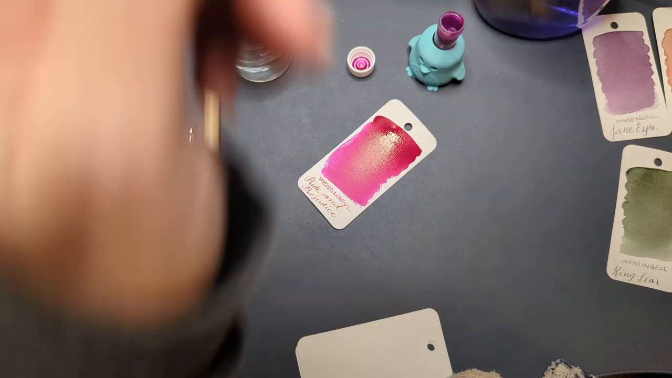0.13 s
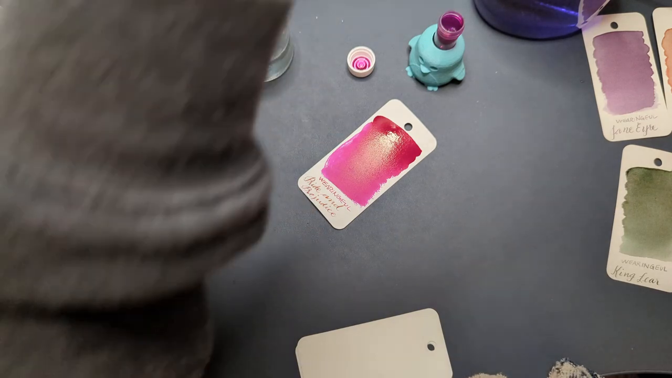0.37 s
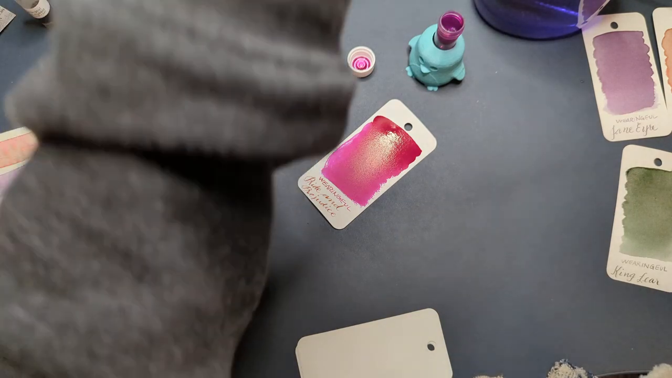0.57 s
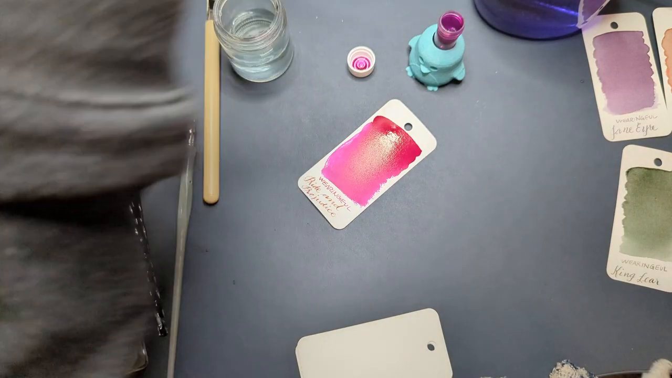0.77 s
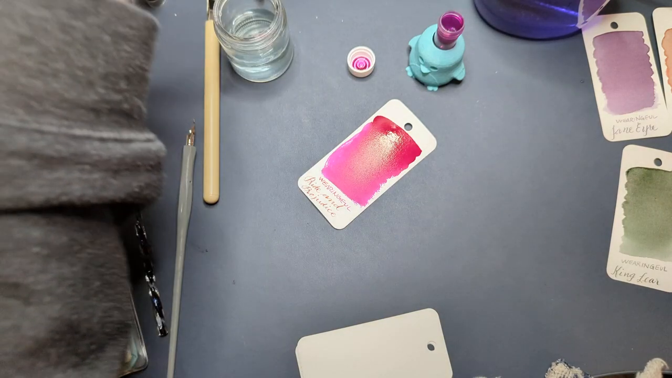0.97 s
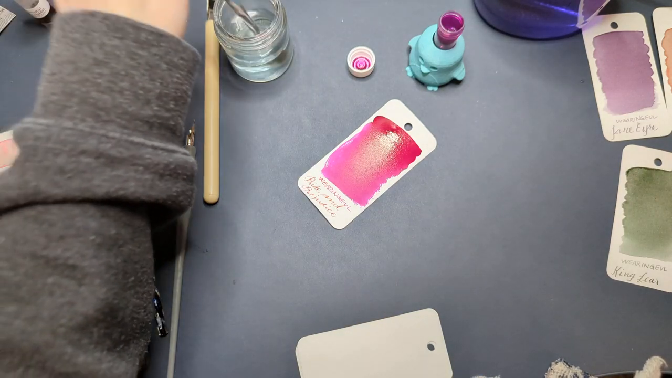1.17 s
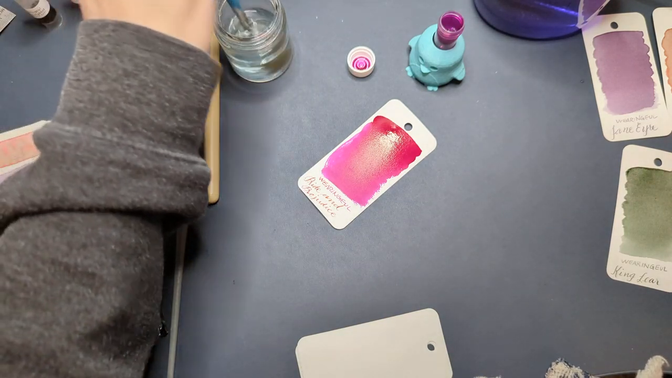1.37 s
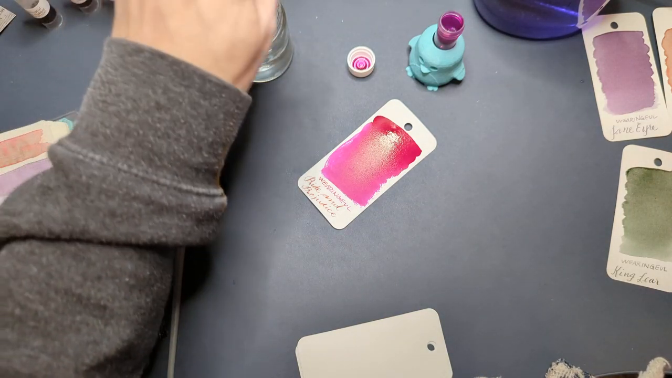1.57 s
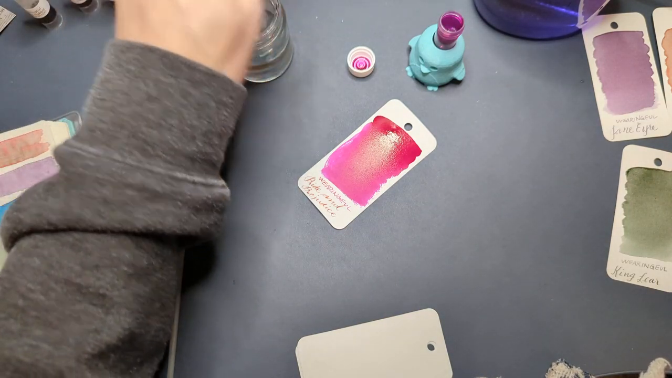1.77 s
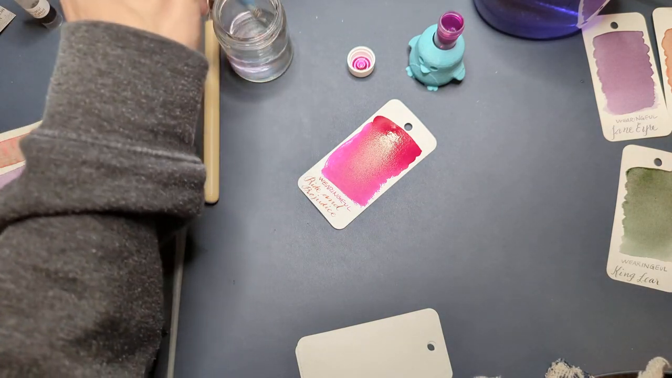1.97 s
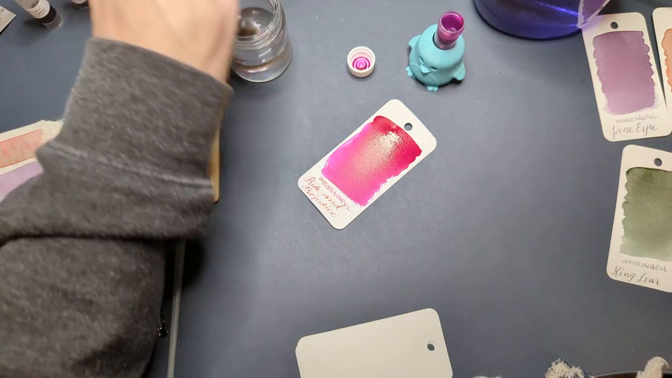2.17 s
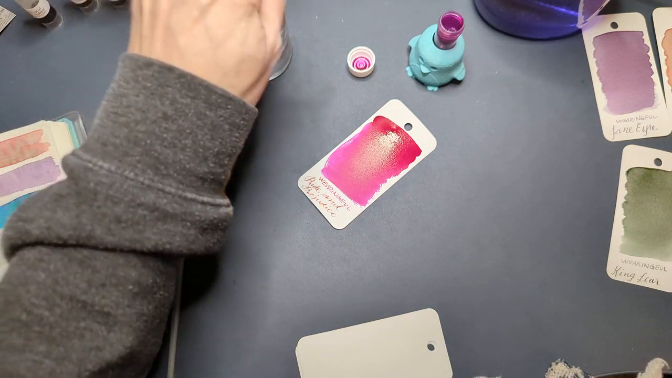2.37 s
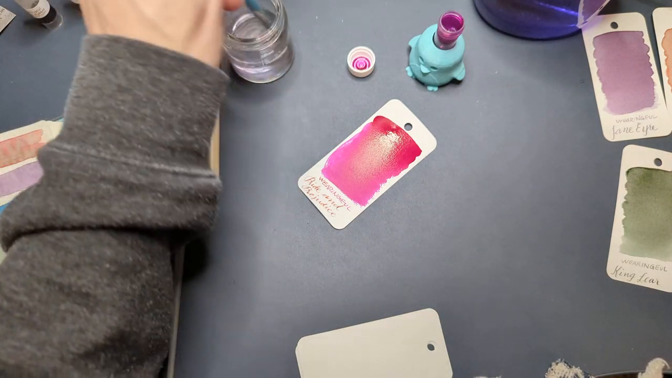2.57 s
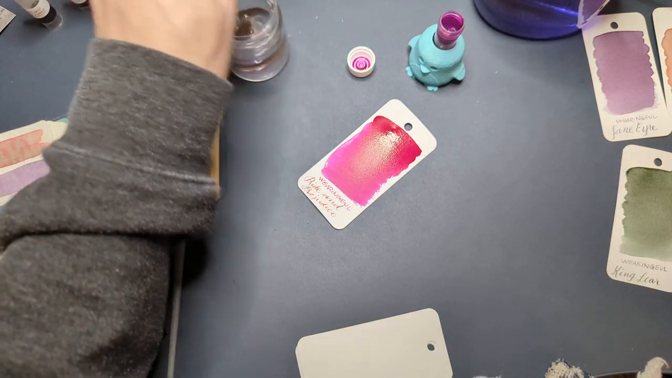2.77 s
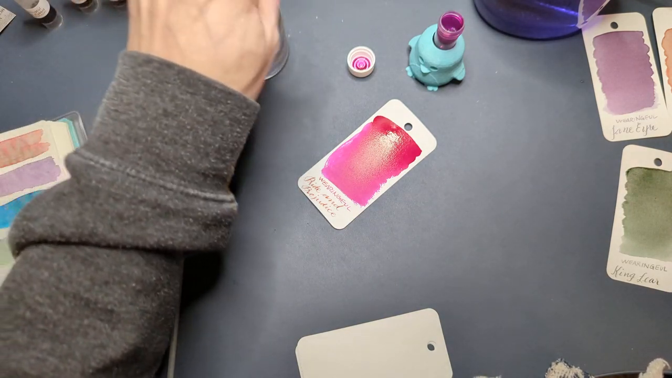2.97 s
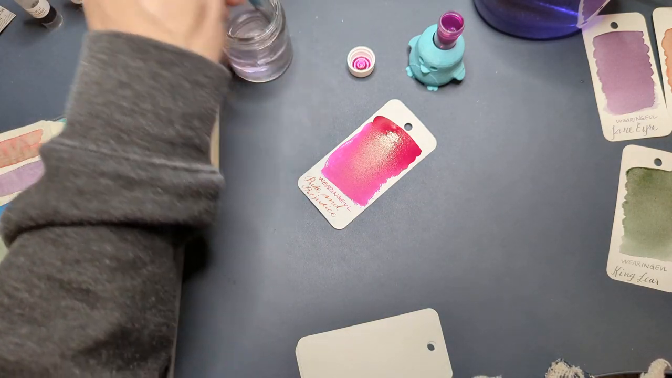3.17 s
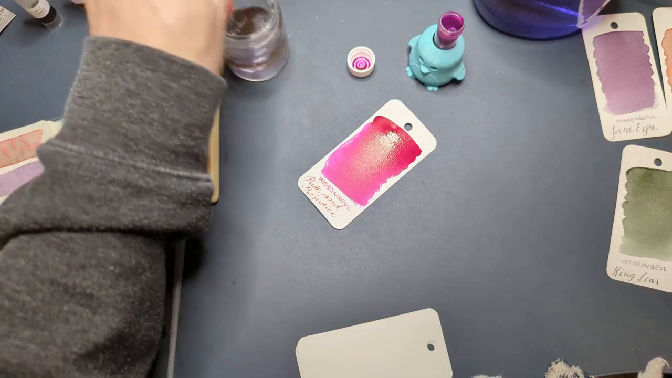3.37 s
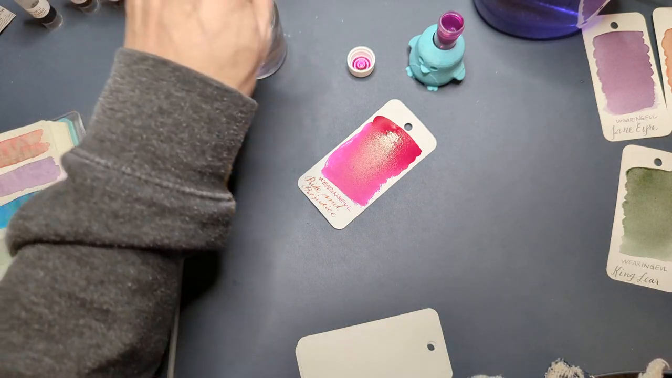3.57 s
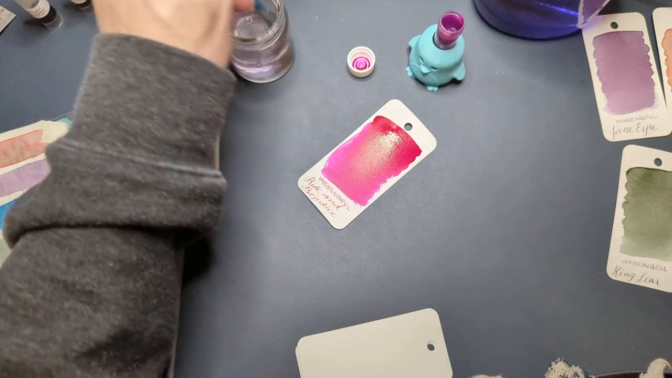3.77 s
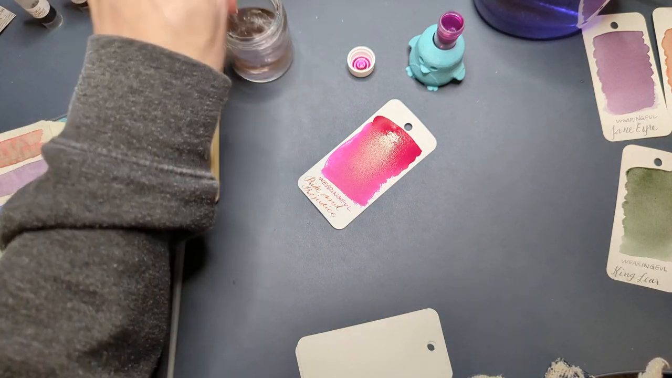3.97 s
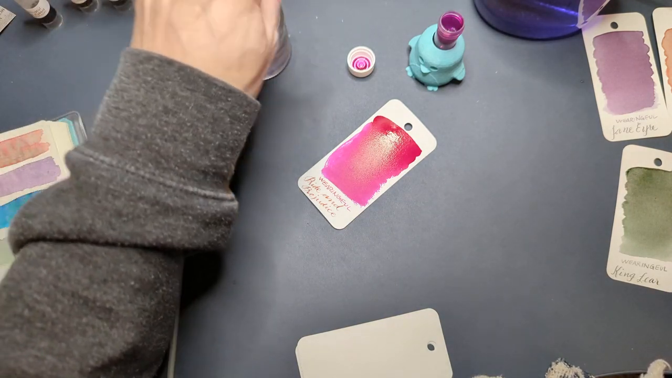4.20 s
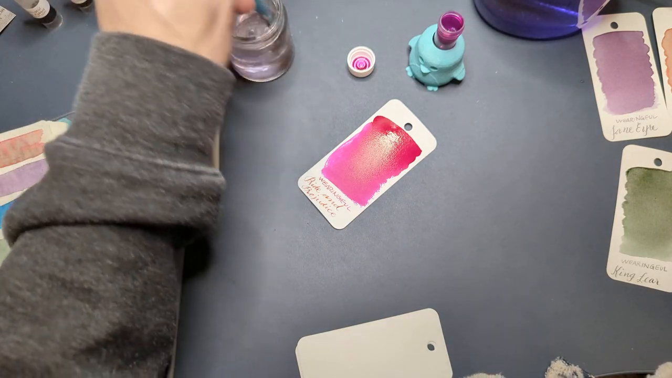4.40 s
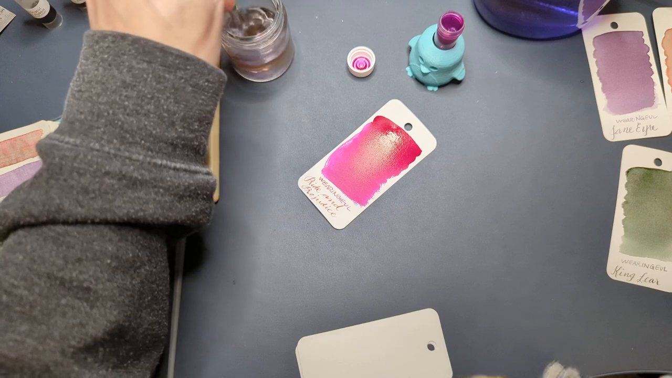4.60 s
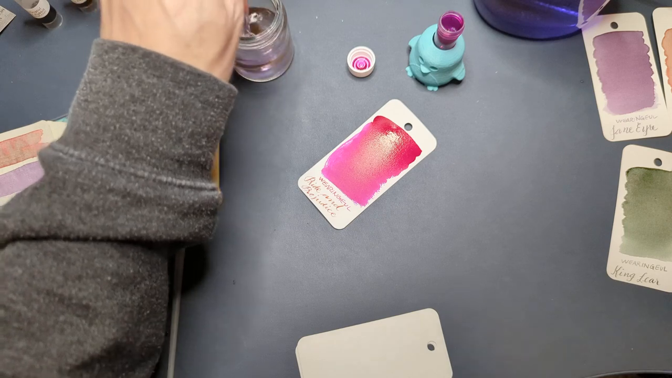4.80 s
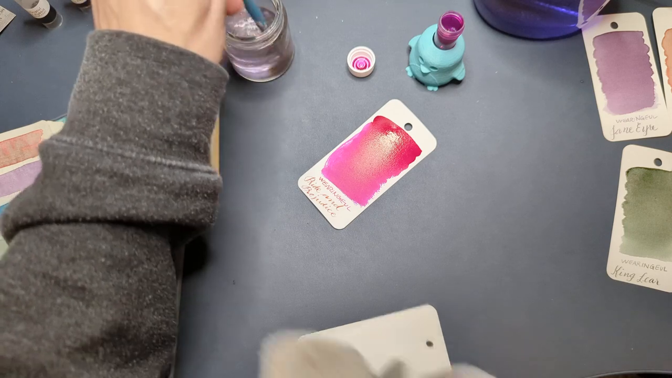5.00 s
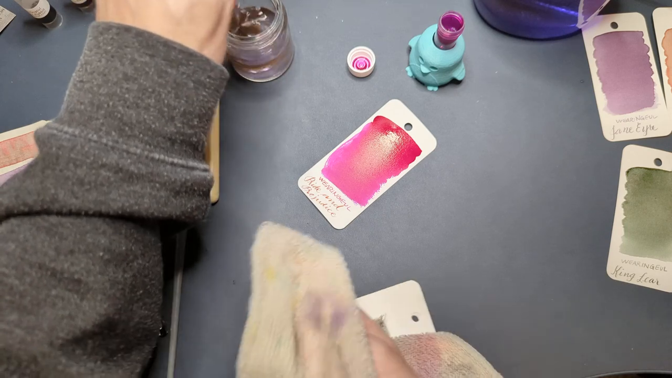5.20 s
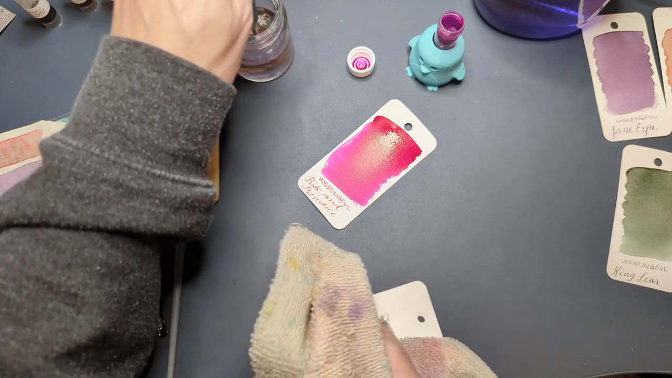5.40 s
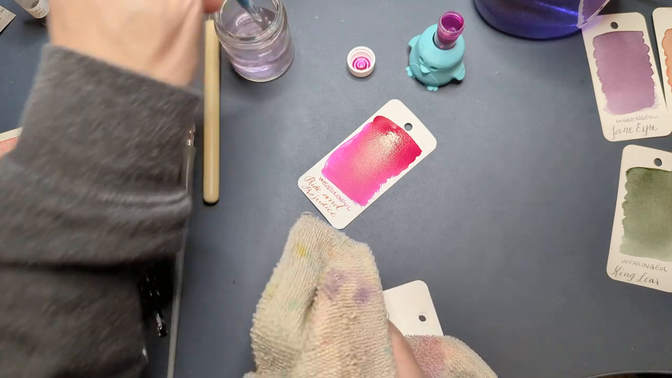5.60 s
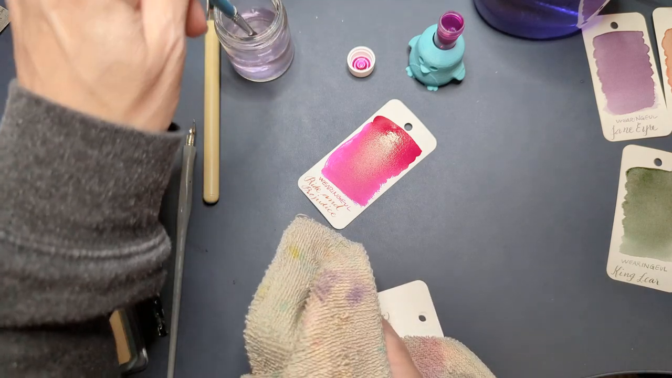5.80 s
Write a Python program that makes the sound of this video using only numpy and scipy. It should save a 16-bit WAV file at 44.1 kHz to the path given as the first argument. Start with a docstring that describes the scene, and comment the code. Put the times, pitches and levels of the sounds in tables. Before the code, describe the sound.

A pen taps inside a small glass jar of water, sparsely then steadily, with soft desk rumbles and a late sleeve rustle.

```python
"""In a quiet room, a phone above the desk hears house hum and hiss throughout: shaped stereo noise.
A pen in a small glass jar of water gives sparse clinks, then from 2 s about three a second with rebounds.
Each clink is a noise crack and decaying sines for the parts of the jar, answered by the walls.
Each full tap nudges the jar, which rumbles on the desk mat: noise in three bands.
A sleeve rustles faintly at the start and plainly from about 4.6 s: cloth-coloured noise."""
import sys
import numpy as np
from scipy import signal
from scipy.fft import rfft, irfft, next_fast_len
from scipy.io import wavfile
from scipy.ndimage import map_coordinates

SR = 44100
rng = np.random.default_rng(int(sys.argv[2]) if len(sys.argv) > 2 else 0)


def generate_wav(sig):
    """Save sig (samples, or channels by samples) to the path in sys.argv[1] as 16-bit PCM at SR."""
    pcm = np.round(np.clip(np.atleast_2d(sig).T, -1, 1) * 32767).astype(np.int16)
    wavfile.write(sys.argv[1], SR, pcm)


N = 257984  # samples, about 5.85 s


def amp(db):
    """Amplitude factor of a level in dB."""
    return 10 ** (np.asarray(db) / 20)


def unit(x):
    """x scaled to rms 1."""
    return x / np.sqrt(np.mean(x ** 2) + 1e-20)


def along(points, hz):
    """Value at hz between (f/Hz, value) points, on a log frequency axis."""
    f, value = np.transpose(points)
    return np.interp(np.log(hz + 1), np.log(f + 1), value)


def filtered(x, response):
    """x times a (possibly complex) response of frequency."""
    m = next_fast_len(N + 8192)
    hz = np.fft.rfftfreq(m, 1 / SR)
    return irfft(rfft(x, m) * response(hz), m)[..., :N]


def wobble(rate):
    """A smooth random curve, rate knots a second."""
    knots = rng.standard_normal(int(N * rate / SR) + 4)
    return map_coordinates(knots, [np.arange(N) * rate / SR])


STEADY_TOP_HZ = 15900  # upper edge of the noise beds


def rush(spectrum, alike):
    """Stereo noise of rms 1: the share of mid and side sets how alike the two ports are at each frequency."""
    def mid_and_side(hz):
        turn = np.arccos(np.clip(along(alike, hz), -1, 1)) / 2
        shape = amp(along(spectrum, hz)) * (hz < STEADY_TOP_HZ)
        return shape * [np.cos(turn), np.sin(turn)]

    mid, side = filtered(rng.standard_normal((2, N)), mid_and_side)
    return unit(np.array([mid + side, mid - side]))


# full taps of the pen: (t/s, crack level/dB, ring levels/dB of base, wall, belly, shoulder, neck,
# push on the jar level/dB)
FULL_TAPS = [(0.0167, -58, -52.5, -46.5, -46.5, -56, -62, -77),
             (1.269, -27.5, -39.5, -32, -44.5, -70, -38, -54),
             (2.0746, -72.5, -57, -26.5, -64, -84, -71, -86), (2.1532, -27, -61, -10.5, -43, -57, -31, -52),
             (2.4907, -19, -44.5, -25.5, -32, -32, -32, -48),
             (2.7625, -23, -54, -34, -37, -34.5, -24.5, -45),
             (3.1139, -14, -50.5, -29.5, -32, -25.5, -21.5, -47.5),
             (3.3878, -10, -58, -35, -30, -24, -15, -44), (3.707, -16, -46, -35, -31, -22.5, -21, -43),
             (4.0042, -18, -42.5, -30.5, -32, -26.5, -26, -46.5),
             (4.348, -16.5, -47, -29.5, -33.5, -27, -14.5, -49),
             (4.6492, -35, -60, -32, -52, -41.5, -36.5, -59),
             (4.9583, -13, -63.5, -40, -33.5, -39, -47, -62),
             (5.2325, -35, -63.5, -36, -49, -47, -40.5, -62.5),
             (5.5135, -18.5, -69, -52, -39, -36.5, -63, -68.5)]
# glancing rebounds, too light to move the jar: (t/s, crack level/dB, neck ring level/dB)
REBOUNDS = [(2.803, -20.5, -44.5), (3.1556, -24.5, -35), (3.4183, -21, -46.5), (4.0366, -19, -52.5),
            (4.2033, -49.5, -75), (4.4037, -27, -39), (5.026, -39.5, -52), (5.2588, -30.5, -54.5)]
# a rebound's ring against its crack: (base, wall, belly, shoulder level/dB)
GLANCE_DB = (-27.5, -28, -20, -25.5)
RIM_DB = -21  # the thin rim follows the sharpness of the blow: its ring against the crack


def contacts():
    """Rows of t/s, crack level/dB and ring levels/dB of base, wall, belly, shoulder, neck and rim."""
    full = [row[:-1] for row in FULL_TAPS]
    light = [(s, crack, *np.add(crack, GLANCE_DB), neck) for s, crack, neck in REBOUNDS]
    return [(*row, row[1] + RIM_DB) for row in full + light]


def ring(modes, part, length, t):
    """Decaying modes of one struck part, strengths new each blow; each port has its own level and phase."""
    swell, scatter, pan_db, lead = part
    ports = np.array([[.5], [-.5]])  # left, right
    tones = 0
    for hz, db, t60 in modes:
        level = amp(db + 2 * rng.normal() - 60 * t / (length * t60))
        pitch = hz * (1 + scatter * rng.normal())
        tones = tones + level * np.sin(2 * np.pi * pitch * t + ports * lead)
    return amp(ports * pan_db) * (1 - np.exp(-t / swell)) ** 3 * tones


# modes of the jar, one list each for base, wall, belly, shoulder, neck, rim:
# (f/Hz, mean level/dB, t60/s before the water damps it)
JAR_MODES = [
    [(880, -4, .05), (1003, 0, .05), (1114, -1.5, .05), (1250, -1.5, .05), (1400, 0, .05),
     (1500, -2.5, .05)],
    [(1590, -9, .03), (1642, -2.5, .04), (1697, 0, .05), (1770, -12, .03)],
    [(1860, 0, .03), (2090, 0, .03), (2300, -4, .025), (2500, -5, .025), (2780, -3, .025), (3080, -5, .025),
     (3370, -4, .03)],
    [(4550, -8, .035), (4910, -6, .03), (5220, 0, .03), (5420, -6, .025), (5650, -5, .025)],
    [(6145, -5, .07), (6283, 0, .045), (6500, -18, .04)],
    [(8090, 0, .02), (9880, 0, .02), (11000, -2, .018), (12300, 1, .02), (14300, -3, .015)],
]
# the same parts: (build-up t/s, relative pitch scatter from the sloshing water, left over right level/dB,
# left lead/rad)
JAR_PARTS = [(0.0012, 0.01, -2.05, 0.99), (0.0025, 0, 6.5, 0.33), (0.00033, 0.06, -0.6, 1.8),
             (.0006, 0.04, -1.54, 1.7), (0.00096, 0.01, -4.5, 0.89), (0.00013, 0.1, 5, 0.7)]
# colour of the pen's crack on the glass: (f/Hz, filter level/dB)
CRACK_COLOUR = [(530, -57), (900, -47), (1870, -8), (4220, -12.5), (6230, -7.5), (7390, -13),
                (12500, -17.5), (14300, -19), (16500, -25)]
DAMPED = 0.62  # the water shortens every ring to this share


def clinks():
    """Every contact cracks as a noise burst and rings each part of the jar at its own level."""
    glass, cracks = np.zeros((2, N + SR)), np.zeros((2, N + SR))
    t = np.arange(SR // 4) / SR
    for s, crack_db, *parts_db in contacts():
        start = round(s * SR)
        at = slice(start, start + len(t))
        for db, modes, part in zip(parts_db, JAR_MODES, JAR_PARTS):
            glass[:, at] += amp(db) * ring(modes, part, DAMPED, t)
        envelope = amp(crack_db - 60 * t / 0.014) * (1 - np.exp(-t / 0.0003))
        burst = envelope * rng.standard_normal(len(t))
        # the left port hears it 7 samples earlier and slightly louder
        cracks[:, at] += [burst, np.roll(burst, shift=7)] * amp([[.8], [-.8]])
    return glass[:, :N] + filtered(cracks[:, :N], lambda hz: amp(along(CRACK_COLOUR, hz)))


# how the room's answer dies: (f/Hz, t60/s)
WALLS_T60 = [(300, .25), (1700, .19), (4000, .16), (6200, .19), (14000, .12)]


def walls(x):
    """Each frequency of the room's answer dies at its own speed; the moving arm changes it every 0.3 s."""
    wet, step = np.zeros((2, N + 2 * SR)), SR * 3 // 10
    for start in range(0, N, step):
        hz, t, z = signal.stft(rng.standard_normal((2, SR // 3)), SR, nperseg=256)
        fade = amp(-60 * t / along(WALLS_T60, hz)[:, None])
        tail = signal.istft(z * fade, SR, nperseg=256)[1]
        tail = tail / np.linalg.norm(tail[0])
        part = signal.fftconvolve(x[:, start:start + step], tail, axes=1)
        wet[:, start + 200:][:, :part.shape[1]] += part  # arrives 200 samples late
    return wet[:, :N]


# noise colours of the nudged jar, each (f/Hz, relative level/dB per Hz): desk top, drag on the desk, scuff
THUMP_COLOUR = [(29, -33), (50, -0.5), (260, -1.5), (340, -31.5), (570, -120)]
DESK_COLOUR = [(150, -29.5), (260, -1), (582, 0.5), (660, -5), (737, -10.5), (859, -25.5), (1050, -12),
               (1240, -22), (1500, -15), (1950, -53), (3300, -120)]
SCUFF_COLOUR = [(410, -37), (700, -9), (873, -22), (1860, -1), (2380, -6), (4620, -12), (6230, -36),
                (7190, -17.5), (15700, -23)]
# likeness of the two ports for the nudged jar: (f/Hz, correlation)
NEAR_ALIKE = [(60, 0.88), (400, 1), (1500, 0.2), (8000, 0.49)]
DRAG_S, DRAG_AT_DB, DRAG_GROWS = 0.037, -48, 0.81  # length of the drag at this push; its power law of the push
# thump against the push at 0 s; later taps reach the desk top less
THUMP_DB, THUMP_FADES_DB_PER_S = 7.5, 3.5
SCUFF_DB, SCUFF_GROWS = -53, 0.58  # scuff at the push DRAG_AT_DB, dB per dB of push


def nudges():
    """The jar drags after each push, longer after a hard one, then settles; noise bands swell and fade."""
    t = np.arange(N) / SR
    thump, drag, scuff = levels = np.zeros((3, N))
    for s, *_, push_db in FULL_TAPS:
        since = np.clip(t - s, 0, None)
        harder_db = push_db - DRAG_AT_DB
        length = DRAG_S * amp(DRAG_GROWS * harder_db)
        settle = amp(-60 * np.clip(since - length, 0, None) / 0.18)
        thump_db = push_db + THUMP_DB - THUMP_FADES_DB_PER_S * s
        scuff_db = SCUFF_DB + SCUFF_GROWS * harder_db
        thump += amp(thump_db) * (1 - np.exp(-since / 0.008)) * settle
        drag += amp(push_db) * (1 - np.exp(-since / 0.0078)) * settle
        scuff += amp(scuff_db - 60 * since / 0.49) * (1 - np.exp(-since / .003)) * settle
    judder = amp([2 * wobble(30), 3 * wobble(70), 2.5 * wobble(300)])
    colours = (THUMP_COLOUR, DESK_COLOUR, SCUFF_COLOUR)
    return sum(level * rush(colour, NEAR_ALIKE) for level, colour in zip(levels * judder, colours))


# course of the sleeve's rustle: (t/s, level/dB)
SLEEVE_COURSE = [(0, -88.5), (.15, -77), (.4, -89), (.7, -105), (4.55, -105), (4.68, -71), (4.92, -74.5),
                 (5.0, -67.5), (5.06, -68.5), (5.13, -62), (5.21, -73.5), (5.452, -79.5), (5.85, -100)]
# colour of the cloth: (f/Hz, relative level/dB per Hz)
CLOTH_COLOUR = [(470, -37.5), (800, 1), (1030, -2), (1420, -4), (1530, -2), (6570, -4.5), (15700, -6.5)]
# likeness of the two ports for sleeve and room tone: (f/Hz, correlation)
ROOM_ALIKE = [(60, 0.94), (180, 0.94), (550, 0.25), (1650, -0.081), (4970, -0.27), (15000, -0.3)]


def sleeve():
    """Cloth rustles while the arm moves: coloured noise with an unsteady level."""
    s, db = np.transpose(SLEEVE_COURSE)
    course_db = np.interp(np.arange(N) / SR, s, db)
    flicker_db = 1.2 * wobble(18) + 1.5 * wobble(150)
    return amp(course_db + flicker_db) * rush(CLOTH_COLOUR, ROOM_ALIKE)


# colour of the house hum: (f/Hz, relative level/dB per Hz)
HUM_COLOUR = [(18, -35), (30, -4.5), (54, 3.5), (86, -7), (119, -3.5), (157, -11.5), (317, -19), (355, -25),
              (392, -20.5), (535, -20), (779, -28.5), (1500, -39.5), (1950, -76.5), (3300, -120)]
# colour of the microphone hiss before the port lifts it: (f/Hz, relative level/dB per Hz)
HISS_COLOUR = [(880, -29.5), (1500, -2.5), (1720, -2.5), (1970, -0.5), (2090, -6), (2290, -2), (4740, -6.5),
               (6360, -6), (7890, -6.5), (10100, -4.5), (15700, -11)]
# resonance of the microphone port in the hiss: (centre f/Hz, width f/Hz, peak level/dB)
PORT = (6250, 550, 7)
HUM_DB, HISS_DB = -60.5, -78  # mean hum level; hiss level before the port's lift


def room_tone():
    """Low, slowly wavering hum of the house over microphone hiss, which the port lifts at its resonance."""
    centre, width, peak_db = PORT
    lift = lambda hz: amp(peak_db / (1 + ((hz - centre) / width * 2) ** 2))
    hum = amp(HUM_DB + 0.41 * wobble(2.6)) * rush(HUM_COLOUR, ROOM_ALIKE)
    hiss = amp(HISS_DB) * filtered(rush(HISS_COLOUR, ROOM_ALIKE), lift)
    return hum + hiss


def scene():
    """The jar and its answer from the walls, the desk, the sleeve and the room."""
    jar = clinks()
    return jar + amp(-9.5) * walls(jar) + nudges() + sleeve() + room_tone()


TOP_HZ = 16800  # band limit of the phone


def record(dry):
    """The phone cuts the deepest bass with six poles at 26 Hz and keeps nothing above its band limit."""
    x = filtered(dry, lambda hz: (1j * hz / (1j * hz + 26)) ** 6)
    return filtered(x, lambda hz: hz < TOP_HZ)


dry = scene()
out = record(dry)
generate_wav(out)
```